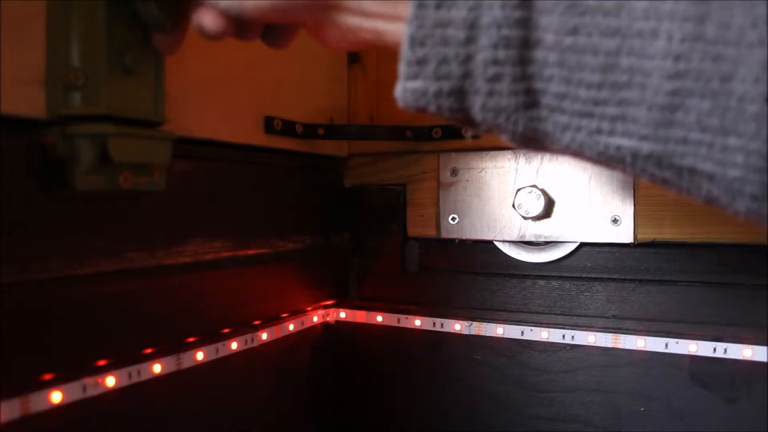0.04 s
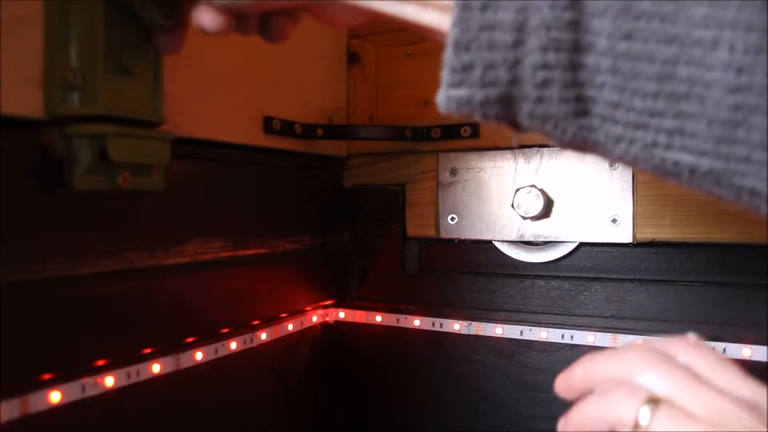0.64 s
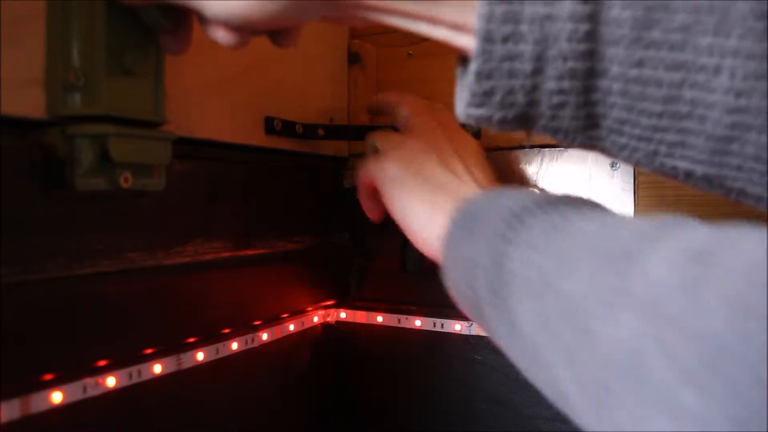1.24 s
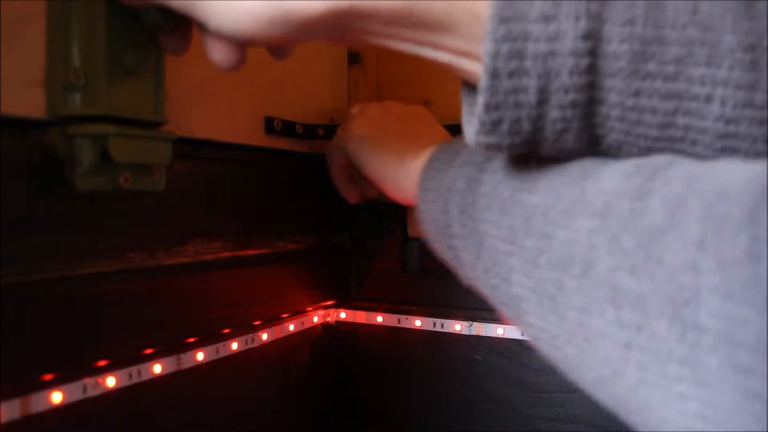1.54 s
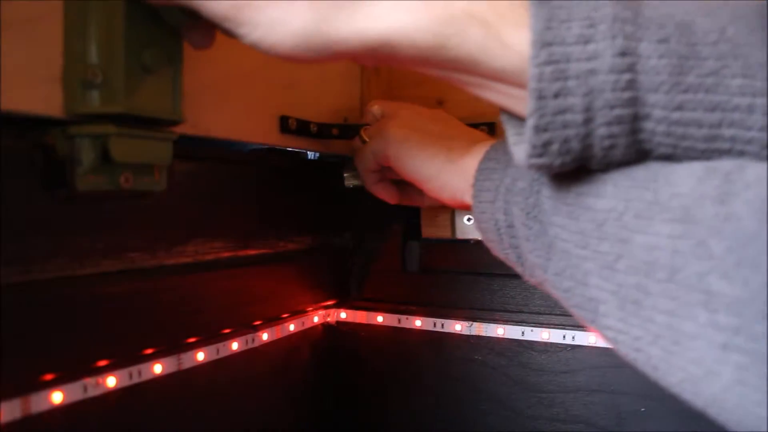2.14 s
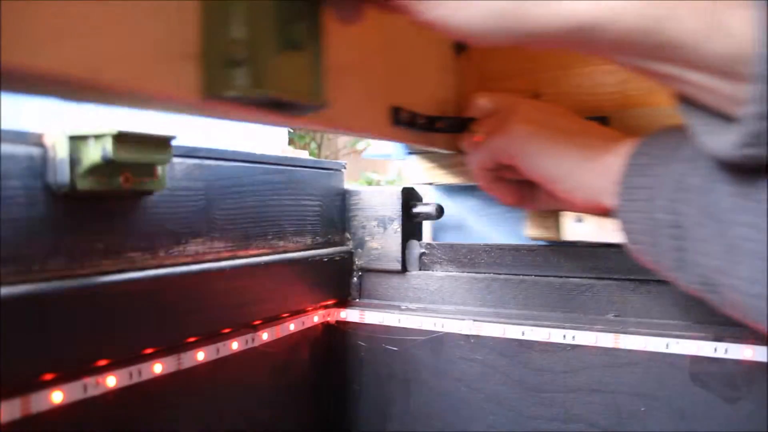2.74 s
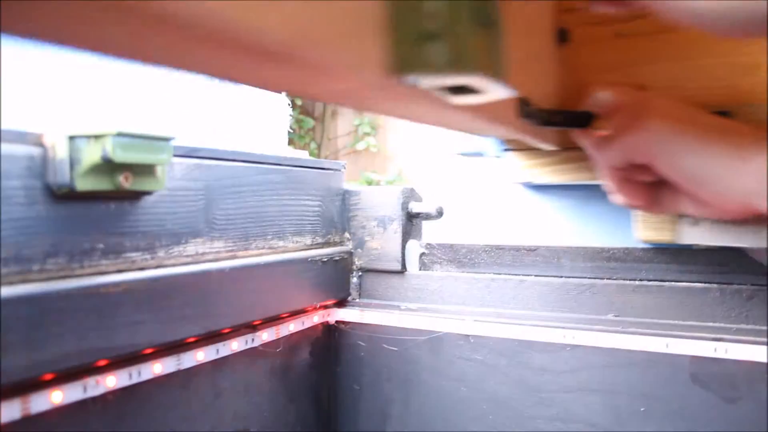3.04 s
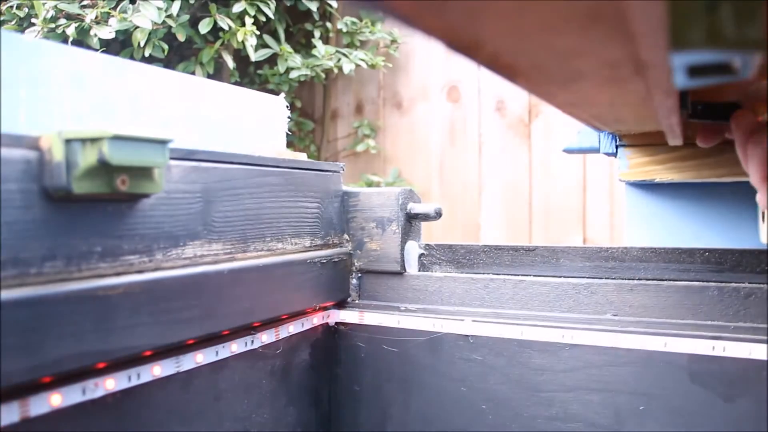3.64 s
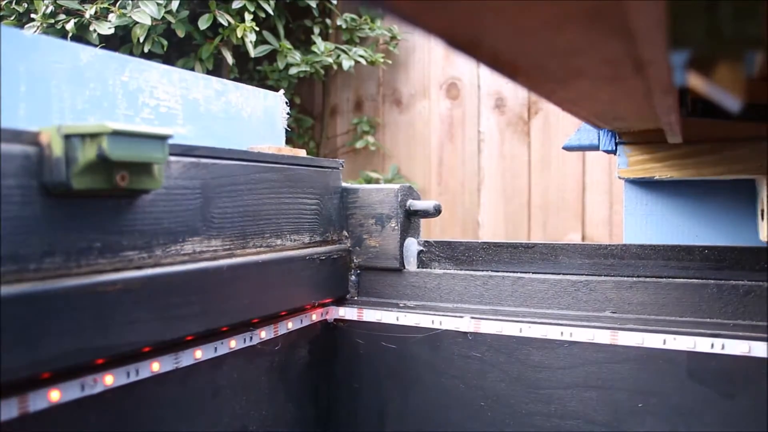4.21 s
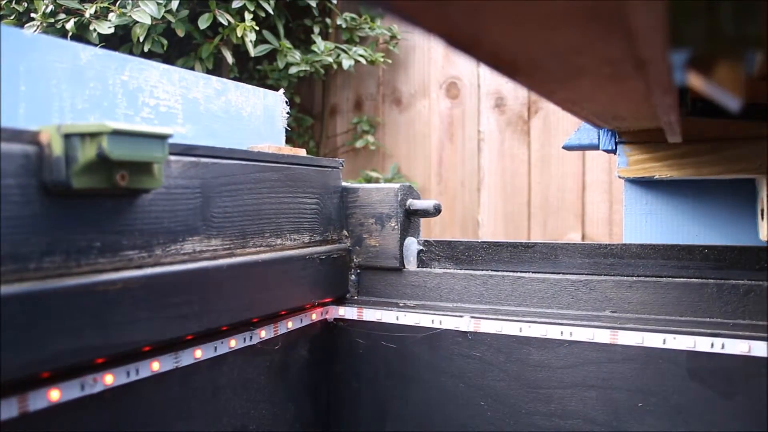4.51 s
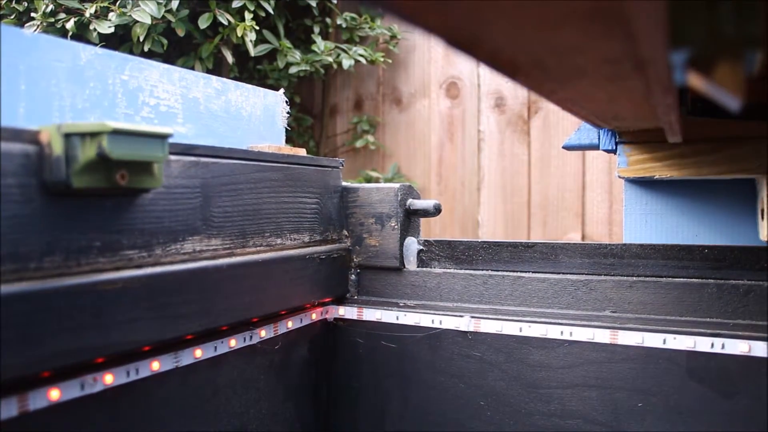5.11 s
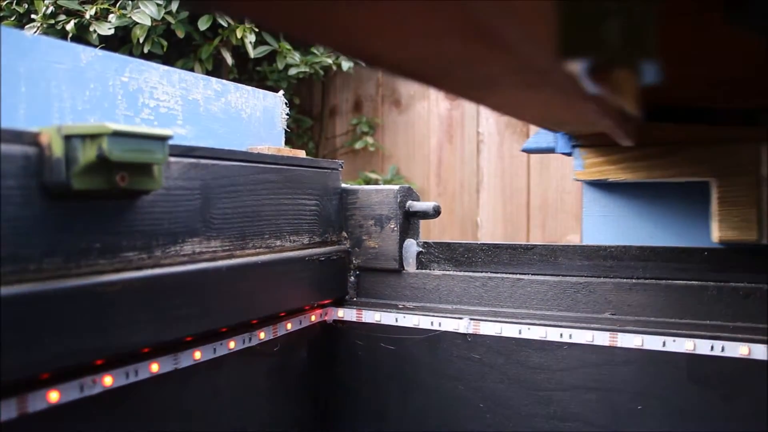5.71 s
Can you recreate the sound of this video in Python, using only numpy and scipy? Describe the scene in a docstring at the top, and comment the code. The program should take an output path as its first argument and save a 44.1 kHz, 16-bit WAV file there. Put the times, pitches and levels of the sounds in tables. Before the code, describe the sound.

Inside a small wooden shed, a sleeve brushes past close to the microphone with a few soft bumps. Sharper knocks free the wheeled roof, which rolls back with a low timber rumble, grinding grit and brief wheel rasps and squeaks. It stops, a steel latch scrapes and snaps loudly, a light fitting ticks, and the roof creeps on quietly. Small birds call very faintly outside.

```python
"""A wooden shed roof rolls back on its wheels, heard from inside: bumps in the rails make the timber
rumble, and crushed grit grinds and hisses. First a sleeve brushes past and a hand knocks the roof loose.
As it rolls, a wheel rasps and chirps. It stops, a steel latch scrapes and snaps over, a light fitting
is tapped, and the roof creeps on. Small birds call faintly in the air outside."""
import sys
import numpy as np
from scipy import signal
from scipy.fft import rfft, irfft, next_fast_len
from scipy.io import wavfile
from scipy.ndimage import uniform_filter1d

SR = 44100
rng = np.random.default_rng(int(sys.argv[2]) if len(sys.argv) > 2 else 0)


def int16_out(signal):
    """Quantize to a 16-bit WAV file."""
    q = np.round(np.clip(np.atleast_2d(signal).T, -1, 1) * 32767)
    wavfile.write(sys.argv[1], SR, q.astype(np.int16))


N = 258867
TIME = np.arange(N) / SR

# Stereo image. Each row: frequency in Hz, left-right correlation.
LIKENESS = [(100, 0.96), (250, 0.94), (500, 0.87), (1000, 0.79), (2000, 0.54), (4000, 0.49), (8000, 0.061),
            (14000, 0.042)]
# Tone colours. Each row: frequency in Hz, relative level per hertz in dB.
AIR = [(12, -31), (20, -3.5), (113, -6), (182, -13.5), (328, -5.5), (410, -15.5), (642, -12.5),
       (1530, -22.5), (1810, -22.5), (2670, -25.5), (2990, -25.5), (3950, -27), (4300, -27), (8890, -34),
       (16000, -44.5)]   # outdoor bed
WALLS = [(100, -4), (400, 0), (1200, 1.5), (3500, -2), (7000, -13.5), (10000, 2), (14000, -8)]   # reflections off the planks
CLOTH = [(150, -23), (250, -2), (450, -6.5), (1010, -9), (1350, -9.5), (2280, -13.5), (4820, -19),
         (16000, -37)]   # sleeve fibres
DRAG = [(200, -11.5), (480, -12), (660, 1), (800, -2.5), (1100, -6.5), (1700, -11), (3400, -12),
        (4200, -20.5), (5000, -29), (8000, -36), (14000, -67)]   # latch scraping its keeper
PLATE = [(300, 0), (740, 1), (1150, -3), (1800, 0), (2600, -12), (3050, -6), (3480, -2), (3800, -19),
         (4400, -17), (4900, -9.5), (5500, -13), (5900, -20), (6780, -11), (7700, -24), (8500, -17),
         (9400, -32), (10200, -24), (11300, -44), (15000, -46)]   # dense modes of the catch plate and mount
BOARDS = [(60, 5), (150, 12), (300, 4.5), (600, -4.5), (1200, -5), (2600, -5.5), (5000, -10.5),
          (10000, -10.5), (16000, -32)]   # dense modes of struck boards
RUMBLE = [(25, -19), (48, -2), (75, -6), (100, 2), (145, 2), (190, -10.5), (240, -8), (320, -23.5),
          (450, -25)]   # low end of the roll
GRIND = [(170, -10), (280, 1), (410, -0.5), (500, -4), (680, -2.5), (1000, -5.5), (1500, -7), (2000, -11.5),
         (2550, -12), (3050, -13.5), (4500, -22.5)]   # midrange of crushed grit
GRIT = [(1700, 1.5), (2700, -8), (3500, -1.5), (4500, 0), (5700, -3), (7300, -7.5), (9500, -14.5),
        (10400, -22.5), (11500, -26), (14000, -48)]   # its hiss on top

# Bird notes. Each row: start, length and glide time in seconds, first and last pitch in Hz,
# relative level in dB.
BIRD_NOTES = [(0.263, 0.034, 0.037, 3100, 3250, -74), (0.328, 0.042, 0.043, 4330, 3810, -69.5),
              (1.767, 0.038, .05, 7400, 7200, -70), (1.822, 0.066, 0.079, 7330, 6700, -65.5),
              (1.908, 0.074, 0.052, 7380, 7320, -68), (1.96, 0.071, 0.059, 7430, 6780, -64),
              (3.624, 0.045, 0.02, 3480, 4600, -58)]
# Sleeve strokes. Each row: fastest moment in seconds, level in dB, rise and fall in seconds.
STROKES = [(0.35, -62, 0.045, 0.4), (0.661, -54.5, 0.0055, .02), (0.68, -47.5, 0.032, 0.028),
           (0.764, -53.5, 0.026, 0.049), (1.07, -57.5, 0.014, .03), (1.11, -58.5, 0.02, 0.056),
           (1.21, -65, 0.035, 0.26), (1.504, -61, 0.032, 0.017)]

# Hard hits. Each row: start in seconds, relative peak in dB.
FITTING_TAPS = [(5.1630, -30), (5.1638, -43), (5.1675, -53)]
LATCH_SNAPS = [(3.996, -39), (4.023, -35), (4.035, -26), (4.041, -5.5), (4.0414, -15.5), (4.043, -14.5),
               (4.046, -26)]
# Ring of the small parts. Each row: pitch in Hz, relative level in dB, t60 in seconds.
FITTING_MODES = [(300, 2, 0.052), (640, -23, .018), (1090, -1, 0.0047), (1440, 21.5, 0.004),
                 (1620, 7, 0.031), (2470, 4.5, 0.0045), (3640, 4.5, 0.011), (4650, 9, 0.0047),
                 (6260, -7, 0.0054)]
LATCH_MODES = [(355, -12.5, 0.07), (540, -29, 0.056), (774, -19, .04), (1190, -0.5, 0.015),
               (1960, 7.5, 0.01), (2600, -3.5, 0.023), (2900, 4.5, 0.0042), (3260, 15.5, 0.0055),
               (3900, 17, 0.0043), (5550, 12, 0.0045), (6750, 10.5, 0.0056), (8440, -3, 0.0086),
               (10000, -11, 0.0075), (12100, -22, 0.0055), (15100, -20, 0.00405)]
PLATE_MODES = [(1120, -48, 0.18), (1782, -52, 0.15), (3025, -53, 0.21), (3445, -48.5, 0.2),
               (3530, -51, 0.2), (5450, -54, 0.21)]

# Blows on the timber; the row at 3.915 s is the latch's first light contact. Each row: start in seconds, attack
# level in dB, low cut and high cut in Hz, t60 in seconds.
KNOCKS = [(0.327, -60.5, 219, 378, 0.31), (0.591, -50.5, 69.6, 128, 0.56), (0.661, -51.5, 60.4, 131, 0.22),
          (1.039, -37.5, 69.4, 90.5, 0.29), (1.29, -56.5, 227, 605, 0.37), (1.448, -58, 250, 600, 0.48),
          (1.65, -60, 213, 696, 0.19), (2.012, -47, 430, 3320, 0.16), (2.1055, -29.5, 205, 716, 0.13),
          (2.114, -37, 420, 5060, 0.076), (2.129, -40.5, 400, 4200, 0.22), (2.2522, -29, 215, 1120, 0.15),
          (2.384, -49.5, 1430, 6800, 0.43), (2.539, -46, 1200, 6600, 0.31), (3.149, -36, 297, 1800, 0.08),
          (3.525, -32, 198, 690, 0.33), (3.547, -45, 250, 5840, 0.042), (3.551, -40, 150, 330, 0.14),
          (3.7141, -46.5, 190, 2660, 0.07), (3.8134, -45, 190, 3850, 0.032), (3.818, -52, 110, 344, 0.59),
          (3.915, -53.5, 247, 2600, 0.54), (5.222, -54, 135, 171, 0.054), (5.331, -47.5, 282, 3820, 0.14),
          (5.349, -56, 507, 4400, .06), (5.35, -48, 101, 1190, 0.46)]
# Ring of the frame. Each row: pitch in Hz, relative level in dB, share of the blow's t60.
TIMBER_MODES = [(95.6, -11.5, 0.87), (122.5, 3.5, 0.47), (181, -6, 0.59), (234, -0.5, 0.27),
                (281, -6, 0.58), (409.6, -8.5, 0.74), (492, -2.5, 0.36), (670, -4.5, 0.099),
                (986, 3.5, 0.044), (1580, -26, 0.1)]
# Axle chirps. Each row: start in seconds, level in dB, pitch in Hz, t60 in seconds.
CHIRPS = [(3.151, -25.5, 1980, 0.026), (3.210, -36, 2060, 0.061), (3.346, -32.5, 1940, 0.038),
          (3.39, -40, 2030, 0.055), (3.547, -49, 2520, 0.02), (3.547, -56, 5470, 0.19)]
# Wheel rubs. Each row: centre in seconds, level in dB.
RUBS = [(2.56, -52), (2.685, -42.5), (2.835, -43), (2.95, -46), (3.08, -46)]

# Resonances of the moving roof. Each row: centre in Hz, width in Hz, relative level in dB.
RASP_BANDS = [(420, 44, -1), (504, 42, 3), (2310, 100, 4), (2440, 150, 5), (2680, 260, -14)]   # a rubbed side plate
WHEEL_BANDS = [(418, 33, -1.5), (493, 32, 9), (915, 54, -3), (1965, 120, -1.5), (2280, 61, -5),
               (2520, 120, -1)]
RAIL_BANDS = [(7300, 180, -2), (8850, 200, 3), (10230, 170, 1)]
ROOF_BANDS = [(96.7, 9.6, 1.5), (123.6, 37, -7.5), (248.5, 26, -11)]
# Speed curves of the four pushes. Each row: time in seconds, speed in dB (see FULL_SPEED_DB).
LOOSENING = [(2.03, -68.5), (2.12, -64), (2.22, -64), (2.33, -63)]
OPENING = [(2.34, -62.5), (2.392, -61.5), (2.5, -57.5), (2.55, -52), (2.916, -48.5), (3.4, -51.5),
           (3.5, -54.5), (3.569, -57.5), (3.62, -68)]
NUDGE = [(3.625, -65.5), (3.69, -76), (3.755, -67), (3.81, -65), (3.89, -69.5)]
CREEPING = [(5.37, -72), (5.416, -73), (5.87, -61)]
FULL_SPEED_DB = -49.5
# Lurches over uneven spots. Each row: centre in seconds, lift of the frame's boom in dB,
# lift of the boards' drone in dB.
LURCHES = [(2.189, 4, 13), (2.46, 0, -1), (2.525, 6, -1.5), (2.595, 0, 1), (2.725, 2.5, 2.5),
           (2.79, 5.5, -3.5), (2.868, 7.5, 1), (2.93, -2.5, -7), (3.09, 5, 5.5), (3.135, -5, 6),
           (3.17, 0, 7), (3.208, 2.5, 8), (3.245, 4.5, 0.5), (3.3, 6, 2), (3.36, 4, 10), (3.43, 2, 4),
           (3.49, 4, -9), (3.585, 10, 5), (3.83, -5, 14), (3.89, 13, 1), (5.66, 6.5, 7.5), (5.77, 4, 1)]


def from_db(db):
    """Decibels to gain."""
    return 10 ** (np.asarray(db) / 20)


def rms_one(x):
    """Scale to unit rms."""
    return x / np.sqrt(np.mean(x ** 2) + 1e-20)


def steady(x):
    """Ride the gain to hold the rms near 1."""
    return x / np.sqrt(uniform_filter1d(np.mean(x ** 2, axis=0), size=SR // 25) + 1e-9)


def fader(rows):
    """Gain curve through rows of (seconds, dB), fading to silence outside them."""
    s, db = np.transpose(rows)
    return from_db(np.interp(TIME, np.r_[s[0] - .04, s, s[-1] + .04], np.r_[-140, db, -140]))


def swell(s, rise_s, fall_s):
    """An envelope that grows exponentially to 1 at a moment, then dies away."""
    return np.exp(np.where(TIME < s, (TIME - s) / rise_s, (s - TIME) / fall_s))


def bell(s, width_s):
    """A smooth hump of height 1 around a moment."""
    return np.exp(-((TIME - s) / width_s) ** 2)


def drift(rate_hz):
    """A smooth random wobble with rms near 1."""
    hop, settle = 40, 2000
    pole = np.exp(-2 * np.pi * hop * rate_hz / SR)
    white = rng.standard_normal(N // hop + settle + 2)
    slow = signal.lfilter([1], [1, -2 * pole, pole * pole], white)[settle:]
    return np.interp(np.arange(N) / hop, np.arange(len(slow)), rms_one(slow))


def at_hz(points, hz):
    """Read a table on a log-frequency axis."""
    f, value = np.transpose(points)
    return np.interp(np.log(hz + 1), np.log(f), value)


def cut(x, hz, kind, order=2):
    """Butterworth low- or high-pass."""
    return signal.sosfilt(signal.butter(order, hz, kind, fs=SR, output="sos"), x)


def spread(pair, colour):
    """Colour two unrelated signals and mix them as mid and side, narrowest in the bass; rms 1."""
    size = next_fast_len(pair.shape[1])
    hz = np.arange(size // 2 + 1) * SR / size
    mid, side = rfft(pair, size)
    alike = at_hz(LIKENESS, hz)
    roll_off = np.minimum(hz / colour[0][0], 1) ** 2 / np.maximum(hz / colour[-1][0], 1) ** 2
    gain = from_db(at_hz(colour, hz)) * roll_off
    stereo = np.sqrt(1 + alike) * mid + np.sqrt(1 - alike) * side * [[1], [-1]]
    return rms_one(irfft(stereo * gain, size)[:, :pair.shape[1]])


def noise(colour, size=N):
    """Smooth stereo noise of a given colour."""
    return spread(rng.standard_normal((2, size)), colour)


def grains(per_s, size_db):
    """Two streams of tiny random contacts of uneven size."""
    sizes = from_db(size_db * np.minimum(rng.exponential(1, (2, N)), 4))
    signs = rng.choice([-1, 1], (2, N))
    return sizes * signs * (rng.random((2, N)) < per_s / SR)


def ring(modes, t, stretch=1):
    """Decaying sines of a struck body; neighbouring modes swing in opposite directions."""
    return sum((-1) ** k * from_db(db - 60 * t / (t60 * stretch)) * np.sin(2 * np.pi * hz * t)
               for k, (hz, db, t60) in enumerate(modes))


def resonate(x, hz, width):
    """One resonance with unit gain at its peak."""
    r = np.exp(-np.pi * width / SR)
    feedback = [1, -2 * r * np.cos(2 * np.pi * hz / SR), r * r]
    return signal.lfilter(np.array([1, 0, -1]) * (1 - r * r) / 2, feedback, x)


def shaken(x, bands):
    """A body's resonances driven by a stream of contacts; rms 1."""
    return rms_one(sum(from_db(db) * rms_one(resonate(x, hz, width)) for hz, width, db in bands))


def add(out, s, sound):
    """Mix a sound in at a time."""
    start = int(s * SR)
    out[:, start:start + sound.shape[-1]] += sound[..., :N - start]


def clacks(hits, modes):
    """Hard contacts ring a small part."""
    out, body = np.zeros((2, N)), ring(modes, TIME[:SR // 4])
    for s, db in hits:
        add(out, s, from_db(db) * body / np.abs(body).max())
    return out


def shed(x, wet_db, t60):
    """Close plank walls answer within milliseconds and die quickly, differently on each side."""
    t = TIME[:SR // 2]
    tail = noise(WALLS, size=len(t)) * from_db(-60 * t / t60) * (t > .002)
    tail = rms_one(tail) / np.sqrt(len(t))
    return x + from_db(wet_db) * signal.fftconvolve(x, tail, axes=1)[:, :N]


def outdoor_air(level_db=-62):
    """A soft, dark, even bed of noise."""
    return from_db(level_db) * noise(AIR)


def birds(waver=0.02, garden_db=-8.0):
    """Thin, wavering whistles glide under an arch of loudness and scatter off the walls."""
    out = np.zeros((2, N))
    for s, length, glide_s, start_hz, end_hz, db in BIRD_NOTES:
        along = np.clip((TIME - s) / length, 0, 1)
        arch = np.sqrt(4 * along * (1 - along))
        pitch = np.interp(TIME, [s, s + glide_s], [start_hz, end_hz]) * (1 + waver * drift(rate_hz=103))
        out += from_db(db) * arch * np.sin(2 * np.pi * np.cumsum(pitch) / SR)
    return from_db(garden_db) * shed(out, wet_db=11.5, t60=0.17)


def sleeve():
    """Knitted fibres catch and slip by the thousand."""
    strokes = sum(from_db(db) * swell(s, rise_s, fall_s) for s, db, rise_s, fall_s in STROKES)
    return strokes * spread(grains(per_s=18000, size_db=1.0), CLOTH)


def light_fitting():
    """A tapped fitting gives a short, dry tick with a softened top."""
    tick = cut(clacks(FITTING_TAPS, FITTING_MODES), hz=5830, kind="low", order=3)
    return shed(tick, wet_db=-10.5, t60=0.051)


def latch(drag_start_s=3.945, bite_s=3.996, plate_t60=0.292, pan_db=0.8):
    """The latch drags over its keeper, bites ever harder and snaps home; its catch plate rings on."""
    home_s = LATCH_SNAPS[-1][0]
    pressure = from_db(-30.5) * swell(home_s, rise_s=0.054, fall_s=0.0048) * (TIME > drag_start_s)
    pressure *= from_db(-6.5 * (TIME < bite_s))   # a lighter touch before the bite
    scrape = pressure * spread(grains(per_s=5000, size_db=2.0), DRAG)
    steel = scrape + clacks(LATCH_SNAPS, LATCH_MODES)
    t = TIME[:SR // 2]
    shimmer = from_db(-37.5 - 60 * t / plate_t60) * noise(PLATE, size=len(t))
    add(steel, home_s, shimmer + ring(PLATE_MODES, t))
    steel = cut(steel, hz=229, kind="high")   # so small a part radiates no bass
    return shed(steel * from_db([[-pan_db], [pan_db]]), wet_db=-20.0, t60=0.24)


def knocks(boards_db=-0.5, crack_db=-6.0, crack_s=0.0011):
    """Each blow rings frame and boards; a soft contact takes off the top, a stiff spot the bottom."""
    out, t = np.zeros((2, N)), TIME[:SR // 2]
    for s, db, low_cut_hz, high_cut_hz, t60 in KNOCKS:
        envelope = from_db(-60 * t / t60) + from_db(crack_db) * np.exp(-t / crack_s)
        boards = envelope * noise(BOARDS, size=len(t))
        blow = ring(TIMBER_MODES, t, stretch=t60) + from_db(boards_db) * boards
        blow = cut(blow, low_cut_hz, "high", order=3)
        blow = cut(blow, high_cut_hz, "low", order=3)
        attack_rms = blow[:, :SR // 50].std()
        add(out, s, from_db(db) * blow / attack_rms)
    return out


def wheel_chirps():
    """A wheel sticks and slips on its axle in brief, bright rings."""
    out = np.zeros((2, N))
    for s, db, hz, t60 in CHIRPS:
        add(out, s, ring([(hz, db, t60)], TIME[:SR // 4]))
    return shed(out, wet_db=-18, t60=0.37)


def wheel_rasp():
    """While the roof is pushed hardest, a wheel rubs its side plate once a turn."""
    pressure = sum(from_db(db) * bell(s, width_s=0.046) for s, db in RUBS)
    friction = spread(grains(per_s=1500, size_db=-0.5), WALLS)
    return pressure * shaken(friction, RASP_BANDS)


def timber_rumble(speed, split_hz=155, drone_db=-4.0):
    """Bumps in the rails shake the roof: the frame booms below, the boards drone above."""
    frame_lurch, board_lurch = from_db(sum(np.outer(lifts_db, bell(s, width_s=0.018))
                                           for s, *lifts_db in LURCHES))
    # A wheel's contact patch rounds each bump.
    bumps = cut(grains(per_s=900, size_db=2.5)[0], hz=510, kind="low")
    body = shaken(bumps, ROOF_BANDS) + spread(grains(per_s=2000, size_db=2.0), RUMBLE)
    # The roof's weight keeps the rumble even between lurches.
    boom = frame_lurch * steady(cut(body, split_hz, "low", order=5))
    drone = board_lurch * steady(cut(body, split_hz, "high", order=5))
    return from_db(-33.5) * speed ** 1.295 * (boom + from_db(drone_db) * drone)


def rail_grit(speed, wheels_db=-12.5, pan_db=0.3):
    """Grit crushed under the wheels grinds, hisses and rings the wheels and steel rails."""
    crushed = grains(per_s=3000, size_db=2.5)
    grind = spread(crushed, GRIND) + from_db(wheels_db) * shaken(spread(crushed, WALLS), WHEEL_BANDS)
    hiss = spread(grains(per_s=14000, size_db=-3.0), GRIT)
    hiss = rms_one(shed(hiss, wet_db=-15.5, t60=0.13)) * from_db([[-pan_db], [pan_db]])
    load = from_db(1.5 * drift(rate_hz=7.3))   # the weight on the wheels wavers
    return (from_db(-40.5) * speed ** 0.99 * load * grind
            + from_db(-45.0) * speed ** 1.14 * np.sqrt(load) * hiss
            + from_db(-69.5) * speed ** 0.95 * shaken(crushed, RAIL_BANDS))


def rolling_roof():
    """Four pushes move the roof; rumble and grit both swell with its speed."""
    speed = sum(fader(push) for push in (LOOSENING, OPENING, NUDGE, CREEPING)) / from_db(FULL_SPEED_DB)
    return timber_rumble(speed) + rail_grit(speed)


def scene():
    """The full mix, heard from under the roof's edge."""
    roof = rolling_roof() + wheel_rasp() + knocks() + wheel_chirps()
    fitting = light_fitting()
    return roof + latch() + fitting + sleeve() + birds() + outdoor_air()


def record(dry, ceiling=0.24, cutoff_hz=15800):
    """Soft clipping rounds the sharpest peak, and a steep low-pass trims the top."""
    rounded = dry / (1 + (dry / ceiling) ** 4) ** .25
    return signal.sosfilt(signal.ellip(10, .2, 80, cutoff_hz, fs=SR, output="sos"), rounded)


dry = scene()
out = record(dry)
int16_out(out)
```